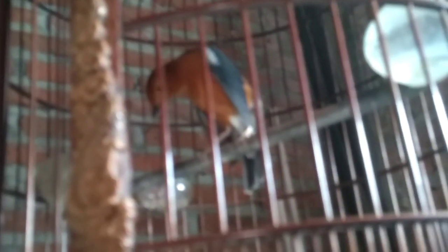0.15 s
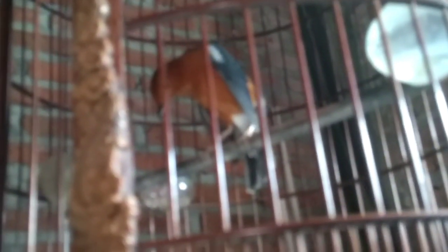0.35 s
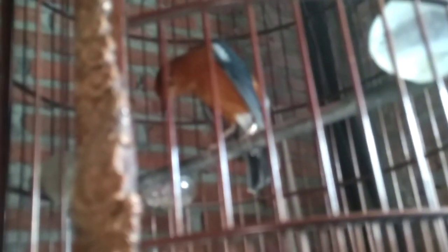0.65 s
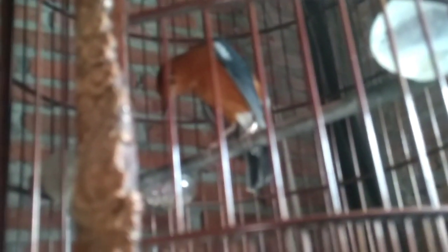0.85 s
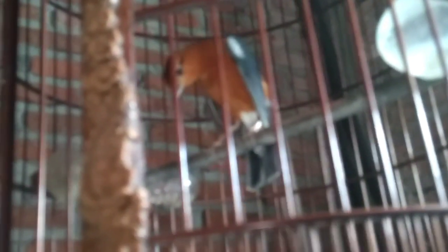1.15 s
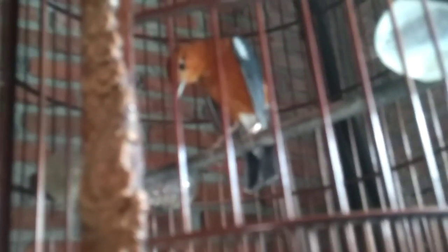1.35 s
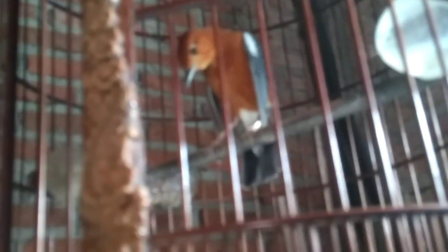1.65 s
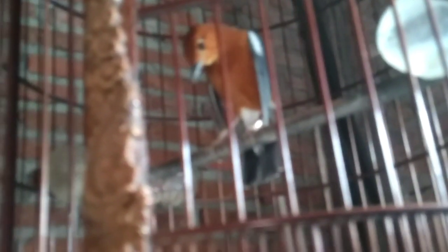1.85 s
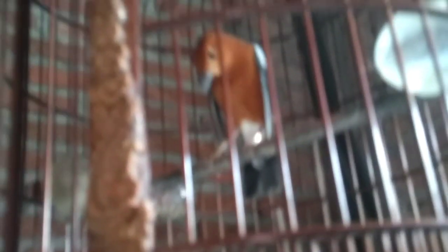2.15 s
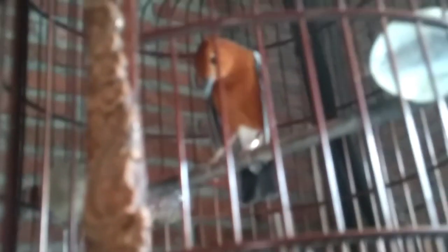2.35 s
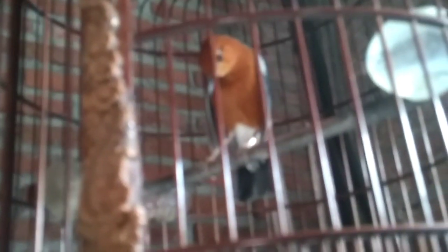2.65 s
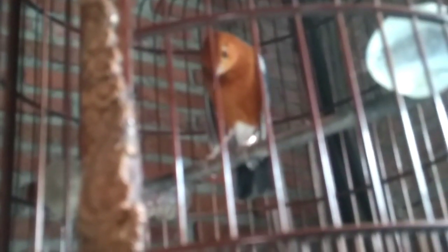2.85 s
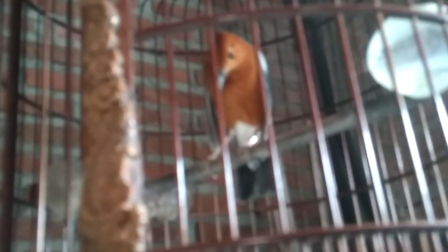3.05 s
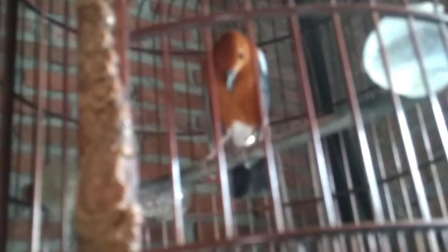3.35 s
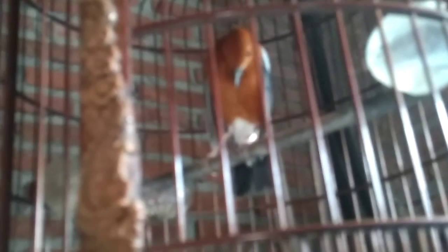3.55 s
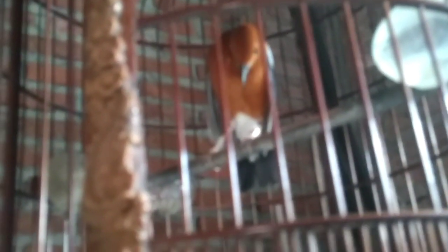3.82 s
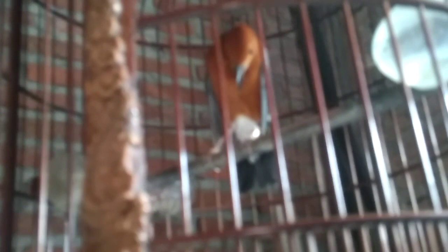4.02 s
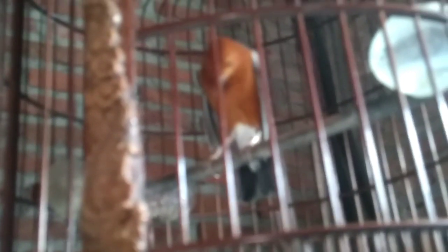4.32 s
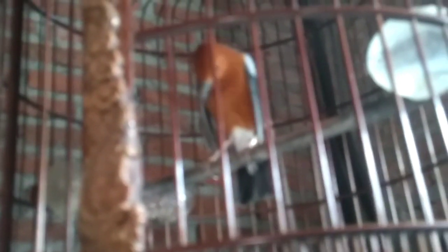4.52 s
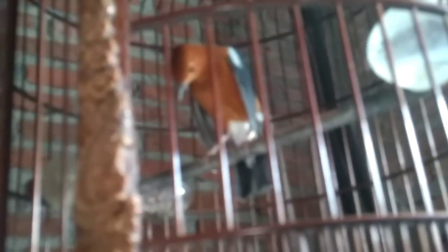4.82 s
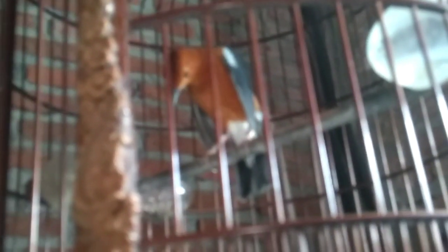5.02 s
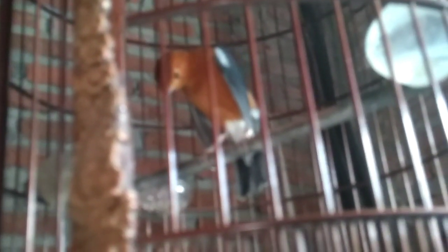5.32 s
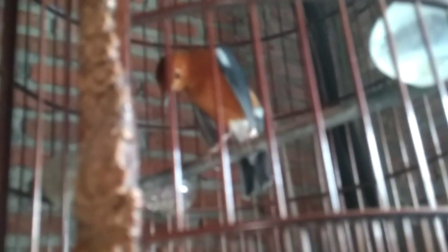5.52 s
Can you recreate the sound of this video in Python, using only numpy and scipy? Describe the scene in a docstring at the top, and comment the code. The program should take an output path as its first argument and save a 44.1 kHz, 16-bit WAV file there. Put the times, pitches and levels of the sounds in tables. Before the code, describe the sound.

One caged thrush sings close to the microphone in a quiet brick-walled space. Two short harsh rasps, a pause, then a soft rising whistle with a quick scoop, four growly upslurs, a burst of rasps and a descending trill, four loud high calls, and finally faint low whistles. A thin wavering hissy whistle swells behind the later part. Short hard reflections follow the notes; sound is almost entirely on the left.

```python
"""A harsh rasp opens the song of a caged thrush close to a one-channel microphone, and a second rasp follows.
Then come a rising whistle, a scoop, four upslurs, a chatter of trills and rasps, loud arched calls and soft low whistles.
Each kind of syllable is one gesture, repeated: curves of pitch, strength and roughness drive a stack of harmonics.
Brick walls throw the notes back, and the loudest overload the recorder. Behind the song, a wavering tone
inside hiss makes a thin whistle that swells and fades, over a soft knock and a quiet bed of noise."""
import sys
import numpy as np
from scipy import signal
from scipy.fft import rfft, irfft
from scipy.io import wavfile
from scipy.ndimage import uniform_filter1d, minimum_filter1d

SR = 44100
rng = np.random.default_rng(int(sys.argv[2]) if len(sys.argv) > 2 else 0)


def unload_wav(signal):
    """Save mono or channel-first audio to the path in sys.argv[1] as 16-bit WAV at rate SR, clipped to [-1, 1]."""
    wavfile.write(
        sys.argv[1],
        SR,
        np.round(np.clip(np.atleast_2d(signal).T, -1, 1) * 32767).astype(np.int16),
    )


N = 250488
TIME = np.arange(N) / SR  # seconds

# Levels of notes are before the level of their phrase; upper_db is the upper overtones against the fundamental.
# Rasps, which pass a crest and tumble with a rebound onto a buzzing shelf, then sag: start_s, crest_s, landing_s,
# sag_s, end_s, start_hz, crest_hz, shelf_hz, end_hz, rebound (share of pitch), level_db, overtones_db, rough (0-1)
RASP_NOTES = [(-.03, -.012, .044, .056, .1, 2700, 2950, 2100, 1260, .04, -11.5, 0, 1),
              (.187, .204, .224, 0.26, .266, 2650, 3520, 2170, 1830, .08, -12.5, 2, .9),
              (3.229, 3.243, 3.245, 3.254, 3.28, 2560, 2987, 2070, 1685, .05, -15, 2, .25),
              (3.31, 3.327, 3.347, 3.364, 3.384, 2553, 3050, 2280, 2300, .08, -10, -1, .85),
              (3.621, 3.634, 3.654, 3.685, 3.702, 2652, 3420, 2202, 1910, .1, -5.5, 0, .6),
              (3.8, 3.82, 3.862, 3.92, 3.888, 3610, 3370, 2130, 1827, .2, -8, 0, .8)]
# The voice of a rasp at start, crest, tumble, landing, sag and end:
# level_db (added to the note's), octave_db, upper_db, rough_share (of the note's roughness)
RASP_STAGES = [(-21, -8, -2, .15), (0, -9.5, -7, .35), (-6, -8, 2, .85), (-12, 10, 10, .5), (-8, 4, 6, .35),
               (-15, -6, -6, .3)]
TUMBLE_SWINGS_PER_S = 42
SHELF_SLOPE = .03  # the shelf tilts down by this share either side of its pitch

# Clear whistles, one curve each: time_s, pitch_hz, level_db, upper_db
RISING_WHISTLE_CURVE = [(1.257, 1344, -42, -22.5), (1.283, 1260, -31.5, -18), (1.32, 1205, -33.5, -13.5),
                        (1.385, 1241, -34.5, -11), (1.46, 1410, -33, -12.5), (1.472, 1542, -22, -27),
                        (1.52, 1698, -32, -11), (1.62, 1870, -24, -15.5), (1.74, 1965, -23, -12.5),
                        (1.93, 1940, -20.5, -9), (1.972, 2047, -29, -7)]
SCOOP_CURVE = [(2.05, 1990, -31, -28), (2.061, 1902, -22.5, -12.5), (2.084, 1829, -15, -13.5),
               (2.104, 2094, -15, -8), (2.121, 3050, -31.5, -21)]
LOW_PIP_CURVE = [(5.246, 1333, -40, -23), (5.265, 1198, -28.5, -23), (5.29, 1202, -45, -14)]
LOW_WHISTLE_CURVE = [(5.351, 1187, -35, -35), (5.391, 1197, -37.5, -13), (5.54, 1259, -33, -35),
                     (5.6, 1228, -29.5, -21), (5.68, 1300, -30.5, -31)]
# Brief burrs in the whistles: time_s, half_length_s, added_rough (0-1 scale)
WHISTLE_BURRS = [(1.258, 0.023, 0.72), (1.379, 0.0097, 0.51), (5.255, 0.048, 0.55), (5.346, 0.02, 1.06),
                 (5.575, 0.042, 0.34)]
WHISTLE_ROUGH, BURR_OCTAVE_DB = .02, -1.5
# the octave starts OCTAVE_OVER_DB above upper_db at LOW_HZ and loses OCTAVE_FALL_DB per octave above it
OCTAVE_OVER_DB, LOW_HZ, OCTAVE_FALL_DB = 3, 1244, 46

# Upslurs: start_s, length_s (full gesture), sung (share of it), pitch_hz, growl_hz, flick_hz,
# growl_swing (share of pitch), level_db, overtones_db
UPSLUR_NOTES = [(2.19, .12, 0.76, 2375, 1340, 2550, .03, -15.5, 2),
                (2.36, 0.12, 0.95, 2650, 1450, 3680, .05, -9.5, 0),
                (2.554, .127, 0.97, 2622, 1620, 3550, .2, -8.5, 0.5),
                (2.768, .148, 1, 2660, 1690, 3330, .22, -9, -1)]
# The gesture of an upslur: length_share, climb (0 growl, 1 note, 2 flick), level_db (added), octave_db, upper_db, rough (0-1)
UPSLUR_GESTURE = [(0, 0.055, -20.5, -12, -19, 0.2), (.08, 0.066, -6, -29, -9.5, 0.4),
                  (.3, 0.00076, -10.5, -11.5, -0.5, .45), (.44, .33, -6.5, -33, -1, 0.7),
                  (.58, .88, -11.5, -17.5, 0.5, .3), (.75, 1, 0, -36.5, -4, .04),
                  (.87, 1.22, -0.5, -32, -12, 0.08), (1, 1.98, -11, -19.5, 5.5, .3)]
GROWL_SWINGS_PER_S, GROWL_SHARE = 56, 0.54  # the pitch swings until this share of the gesture is over
# Notes from the other side of the syrinx, one curve each: time_s, pitch_hz, level_db, octave_db, upper_db, rough (0-1)
SIDE_NOTES = [
    [(2.245, 2940, -22, -15, 4, .27), (2.267, 3264, -23.5, -28, 2, 0.42), (2.285, 3411, -33, -25, 8, 0.13)],
    [(5.222, 2300, -44, 8.5, -21, .31), (5.236, 2703, -22, -36, -28, .12),
     (5.252, 2590, -32, -23, -22, 0.36)],
]

# Trills: start_s, end_s, pitch_hz, end_hz, first_rate (swings per s), last_rate (swings per s), level_db, swell_db
TRILL_NOTES = [(3.205, 3.236, 2350, 2690, 98, 105, -30.5, 13),
               (3.286, 3.322, 2550, 2650, 84, 75, -28.5, 12), (3.38, 3.531, 2720, 1697, 80, 46, -13.5, 2.5)]
TRILL_DEPTH, TRILL_ROUGH = .16, .3  # swing as a share of pitch; roughness 0-1
TRILL_BEND = 5.8  # the pitch holds, then bends late to its end
TRILL_DB_PER_OCTAVE, TRILL_PULSE_DB = 19, 4  # weaker as it sinks, louder at the top of each swing
TRILL_OCTAVE_DB, TRILL_UPPER_DB = -18, -1.5
TRILL_LOUD_DB, TRILL_BRIGHTEN = -13, 1.2  # below this level the overtones lose this many more dB per dB

# Arched calls: start_s, length_s, pitch_hz, level_db, overtones_db
ARCH_NOTES = [(4.307, 0.072, 4432, -3.5, 3), (4.527, .087, 4366, -6, -1), (4.728, .089, 4344, -7.5, 2)]
# Their clean rise and top, break and rough fall: length_share, pitch_ratio, level_db (added), octave_db, upper_db, rough (0-1)
ARCH_GESTURE = [(0, .57, -26, -15, -14, .08), (.104, .83, -4, -51, -19.5, 0.19),
                (.216, .975, -1.5, -47, -9, 0.22), (.53, 1.005, -1.5, -27.5, -13, 0.042),
                (.63, .83, -5, -26, -9.5, 0.198), (.73, .86, 0, -22.5, -7, 0.3315),
                (.88, .67, -11.5, -11.5, -8.5, .95), (1, 0.44, -19.5, -10, -5, .7)]
# The long wavering call that leads them: time_s, pitch_hz, level_db
LONG_CALL_CURVE = [(3.977, 2807, -22.5), (3.988, 4100, -8), (4, 4840, -7), (4.023, 3340, -8),
                   (4.034, 3700, -6), (4.058, 3794, -1.5), (4.074, 4062, -5), (4.094, 4060, -9.5),
                   (4.101, 3534, -6), (4.113, 4023, -5.5), (4.155, 3886, -8.5), (4.16, 3520, -7.5),
                   (4.17, 3702, -5.5), (4.186, 3196, -7), (4.2, 3508, -10)]
LONG_OCTAVE_DB, LONG_UPPER_DB, LONG_ROUGH = -18, -6, 0.049
LONG_BREAK_S = 0.0206  # how quickly roughness builds toward its end

# Colour of the bird's upper overtones, before the throat tightens: tone_hz, level_db
OVERTONE_COLOUR = [(3700, -4.5), (5300, -15), (6700, -9), (8600, -12), (9900, -2.5), (11000, -0.5),
                   (12000, 0.5), (13300, -5), (16000, -6)]
FADE_S = 0.0046  # every note opens and shuts this fast

# First reflections, before the shared early level: delay_s, gain_db
FIRST_ECHOES = [(.0031, -23), (.0074, -7), (0.0129, -5.5), (0.0176, -7)]
# Time for the ring of the walls to fall by 60 dB: tone_hz, t60_s
WALL_RING = [(1200, 0.18), (2500, 0.2), (4500, 0.15), (8000, 0.2), (11000, 0.17), (15000, 0.08)]

# The tone of the thin whistle, before its overall tone level: time_s, pitch_hz, level_db
THIN_TONE = [(3.38, 3500, -30), (3.55, 3590, -21), (3.88, 3827, -14.5), (4.28, 3940, -18.5),
             (4.44, 4150, -32), (4.52, 3700, -77), (4.88, 4250, -31), (4.96, 3700, -58.5),
             (5.04, 4050, -42.5), (5.11, 3620, -45), (5.17, 3830, -36), (5.54, 3730, -37.5),
             (5.68, 3560, -39)]
# Relative colour of its hiss: tone_hz, density_db (per Hz)
THIN_HISS_COLOUR = [(2800, -30), (3400, -10), (3900, 2), (4700, -0.5), (5700, -14), (8500, -6.5),
                    (11300, -1), (15000, -26)]
# Level of its hiss: time_s, level_db
THIN_HISS_LEVEL = [(3.38, -55), (3.55, -27.5), (4.42, -23.5), (4.53, -36), (4.88, -31), (4.96, -43),
                   (5.68, -49)]
# Relative colour of the quiet background: tone_hz, density_db (per Hz)
BACKGROUND_COLOUR = [(25, 2), (110, -8.5), (150, -1), (260, -15.5), (400, -9.5), (800, -21), (11000, -33),
                     (15000, -47)]
EDGE_HZ = 15600  # upper limit of the recorder


def thrush():
    """The whole song: five phrases, each with its own roughness and throat opening."""
    rasps = [rasp(*row) for row in RASP_NOTES]
    whistle_curves = RISING_WHISTLE_CURVE, SCOOP_CURVE, LOW_PIP_CURVE, LOW_WHISTLE_CURVE
    whistles = [whistle(curve) for curve in whistle_curves]
    upslurs = [upslur(*row) for row in UPSLUR_NOTES] + [side_note(curve) for curve in SIDE_NOTES]
    trills = [trill(*row) for row in TRILL_NOTES]
    arches = [long_call()] + [arch(*row) for row in ARCH_NOTES]
    song = phrase(rasps, level_db=1, jitter=0.094, shimmer=0.41, shake_hz=441, split=0.22,
                  low_hz=1417, high_hz=16250, waver=.015)
    song += phrase(whistles, level_db=1.5, jitter=0.083, shimmer=0.45, shake_hz=450, split=0.92,
                   low_hz=1145, high_hz=12570, waver=0.0061)
    song += phrase(upslurs, level_db=0.5, jitter=0.08, shimmer=0.1, shake_hz=280, split=0.346,
                   low_hz=1314, high_hz=11940, waver=0.0046)
    song += phrase(trills, level_db=0, jitter=0.058, shimmer=0.7, shake_hz=440, split=0.19,
                   low_hz=1540, high_hz=15500, waver=.01)
    song += phrase(arches, level_db=0.5, jitter=0.09, shimmer=1.0, shake_hz=493, split=0.41,
                   low_hz=1875, high_hz=16650, waver=0.00298)
    return song


def phrase(gestures, level_db, jitter, shimmer, shake_hz, split, low_hz, high_hz, waver):
    """Syllables that share one kind of roughness and one opening of throat and beak."""
    wobble = waver * flutter(70)
    pitch_shake = jitter * flutter(shake_hz)
    level_shake = shimmer * flutter(shake_hz)
    voice = sum(syllable(gesture, wobble, pitch_shake, level_shake, split) for gesture in gestures)
    return amp(level_db) * band(voice, low_hz, high_hz, order=7)


def syllable(gesture, wobble, pitch_shake, level_shake, split, pure_db=-25, tightening=1.5):
    """The syrinx sounds one harmonic stack; roughness shakes it and splits the pitch in half."""
    # a gesture holds times, pitch Hz, level dB, octave dB and upper dB against the fundamental, roughness
    t, *controls = np.broadcast_arrays(*gesture)
    span = np.round(t * SR).astype(int)
    hz, db, octave_db, upper_db, rough = uniform_filter1d(np.array(controls), size=160, axis=1)
    # the vibration stays cleaner until roughness passes a threshold
    chaos = np.clip(rough, 0, 1) * np.clip(rough / .4, 0, 1)
    hz = hz * (1 + wobble[span])
    phase = 2 * np.pi * np.cumsum(hz * (1 + chaos * pitch_shake[span])) / SR
    k = np.arange(3, 13)[:, None]  # numbers of the upper harmonics
    # in pure notes the throat is tuned tighter and lets fewer overtones through
    tight = 1 + tightening * np.clip(octave_db / pure_db, 0, 1)
    below_limit = np.clip((SR / 2 - k * hz) / (SR / 10), 0, 1)  # fades harmonics out before half of SR
    weight = amp(at_hz(OVERTONE_COLOUR, k * hz) * tight) * below_limit
    upper = (weight * np.sin(k * phase)).sum(0) / np.sqrt((weight ** 2).sum(0) + 1e-12)
    voice = np.sin(phase) + amp(octave_db) * np.sin(2 * phase) + amp(upper_db) * upper
    # strong and weak cycles alternate, which puts lines between the harmonics
    voice = voice * (1 + chaos * (level_shake[span] + split * np.cos(phase / 2)))
    gate = np.clip(np.minimum(t - t[0], t[-1] - t) / FADE_S, 0, 1)
    out = np.zeros(N)
    out[span] = np.sqrt(2) * amp(db) * voice * np.sin(np.pi / 2 * gate) ** 2
    return out


def rasp(start, crest, landing, sag, end, start_hz, crest_hz, shelf_hz, end_hz,
         rebound, level_db, overtones_db, rough):
    """As the pitch tumbles, the voice turns rough and its strength moves into the overtones."""
    t = during(start, end)
    shelf_top, shelf_bottom = shelf_hz * (1 + SHELF_SLOPE), shelf_hz * (1 - SHELF_SLOPE)
    hz = np.interp(t, [start, crest, landing, sag, end],
                   [start_hz, crest_hz, shelf_top, shelf_bottom, end_hz])
    stages = [start, crest, (crest + landing) / 2, landing, sag, end]
    db, octave_db, upper_db, share = (np.interp(t, stages, column) for column in np.transpose(RASP_STAGES))
    depth = rebound * np.sqrt(np.interp(t, stages[1:4], [0, 1, 0]))  # only between crest and landing
    swing = 1 + depth * np.cos(2 * np.pi * TUMBLE_SWINGS_PER_S * (t - crest))
    return t, hz * swing, level_db + db, octave_db + overtones_db, upper_db + overtones_db, rough * share


def whistle(curve):
    """A clear note, purer the higher it goes; burrs roughen it and bring out the octave."""
    t = during(curve[0][0], curve[-1][0])
    hz, db, upper_db = follow(curve, t)
    burrs = np.array([np.exp(-((t - s) / length) ** 2) for s, length, _ in WHISTLE_BURRS])
    octave_db = upper_db + OCTAVE_OVER_DB - OCTAVE_FALL_DB * np.log2(hz / LOW_HZ)
    octave_db = octave_db + burrs.max(0) * (BURR_OCTAVE_DB - octave_db)
    rough = WHISTLE_ROUGH + np.array(WHISTLE_BURRS)[:, -1] @ burrs
    return t, hz, db, octave_db, upper_db, rough


def upslur(start, length, sung, pitch_hz, growl_hz, flick_hz, growl_swing, level_db, overtones_db):
    """A swinging growl steadies and climbs into a pure note, then flicks upward."""
    t = during(start, start + sung * length)
    share = (t - start) / length
    climb, db, octave_db, upper_db, rough = follow(UPSLUR_GESTURE, share)
    hz = np.interp(climb, [0, 1, 2], [growl_hz, pitch_hz, flick_hz])
    depth = growl_swing * np.clip(1 - (share / GROWL_SHARE) ** 4, 0, 1)
    swing = 1 - depth * np.cos(2 * np.pi * GROWL_SWINGS_PER_S * (t - start))
    return t, hz * swing, level_db + db, octave_db + overtones_db, upper_db + overtones_db, rough


def side_note(curve):
    """A brief note from the other side of the syrinx."""
    t = during(curve[0][0], curve[-1][0])
    return t, *follow(curve, t)


def trill(start, end, pitch_hz, end_hz, first_rate, last_rate, level_db, swell_db):
    """Pitch and strength swing fast about their centre, at a rate that drifts from first to last."""
    t = during(start, end)
    share = np.linspace(0, 1, len(t))
    centre = pitch_hz + (end_hz - pitch_hz) * share ** TRILL_BEND
    rate = first_rate + (last_rate - first_rate) * share
    # the sung span opens half a fade early, so the count of swings starts below zero
    swing = np.cos(2 * np.pi * (np.cumsum(rate) / SR - first_rate * FADE_S / 2))
    db = level_db + swell_db * share + TRILL_DB_PER_OCTAVE * np.log2(centre / pitch_hz)
    upper_db = TRILL_UPPER_DB + TRILL_BRIGHTEN * np.minimum(db - TRILL_LOUD_DB, 0)
    hz = centre * (1 + TRILL_DEPTH * swing)
    return t, hz, db + TRILL_PULSE_DB * swing, TRILL_OCTAVE_DB, upper_db, TRILL_ROUGH


def long_call():
    """A loud wavering note, fairly clean until it breaks up at the end."""
    t = during(LONG_CALL_CURVE[0][0], LONG_CALL_CURVE[-1][0])
    rough = LONG_ROUGH + np.exp((t - t[-1]) / LONG_BREAK_S)
    return t, *follow(LONG_CALL_CURVE, t), LONG_OCTAVE_DB, LONG_UPPER_DB, rough


def arch(start, length, pitch_hz, level_db, overtones_db):
    """The arched gesture at one length, pitch, strength and brightness."""
    t = during(start, start + length)
    ratio, db, octave_db, upper_db, rough = follow(ARCH_GESTURE, (t - start) / length)
    return t, pitch_hz * ratio, level_db + db, octave_db + overtones_db, upper_db + overtones_db, rough


def walls(x, early_db=-2, tail_db=-12, build_s=0.036):
    """A few hard reflections, then a short tail that dies band by band."""
    t = TIME[:SR // 2]
    is_tap = rng.random(len(t)) < 4000 / SR  # about 4000 random echoes per second
    taps = rng.standard_normal(len(t)) * is_tap * (1 - np.exp(-(t / build_s) ** 2))
    hz, when, z = signal.stft(taps, SR, nperseg=256)
    decay = amp(-60 * when / at_hz(WALL_RING, hz)[:, None])
    tail = signal.istft(z * decay, SR)[1]
    response = amp(tail_db) * tail / np.linalg.norm(tail)
    for delay, db in FIRST_ECHOES:
        response[round(delay * SR)] += amp(db + early_db)
    return signal.fftconvolve(x, response)[:N]


def thin_whistle(waver=0.006, flicker=0.47, tone_db=-2):
    """A wavering, uneven tone inside a band of nearly even hiss."""
    hz, line_db = follow(THIN_TONE, TIME)
    hiss_db, = follow(THIN_HISS_LEVEL, TIME)
    phase = 2 * np.pi * np.cumsum(hz * (1 + waver * flutter(90))) / SR
    tone = np.sqrt(2) * np.sin(phase) * (1 + flicker * flutter(40))
    hiss = coloured(THIN_HISS_COLOUR, patchy_db=1)
    start = np.clip((TIME - THIN_TONE[0][0]) / 0.041, 0, 1)  # silent before the first row
    return start * (amp(line_db + tone_db) * tone + amp(hiss_db) * hiss)


def bump(start_s=2.19, db=-38, low_hz=60, high_hz=200, decay_s=0.058):
    """A soft low knock during the upslurs, made of low noise that dies away."""
    age = np.maximum(TIME - start_s, 0)
    rumble = unit(band(rng.standard_normal(N), low_hz, high_hz, order=2))
    return amp(db) * rumble * (age > 0) * np.exp(-age / decay_s)


def background():
    """Quiet noise, strongest in the lows, with small uneven patches."""
    return coloured(BACKGROUND_COLOUR, patchy_db=2)


def coloured(spectrum, patchy_db):
    """Noise of a given colour with small, brief patches."""
    hz, _, z = signal.stft(rng.standard_normal(N), SR, nperseg=1024)
    patches = unit(uniform_filter1d(rng.standard_normal(z.shape), size=4, axis=1))
    gain = amp(at_hz(spectrum, hz)[:, None] + patchy_db * patches)
    return unit(signal.istft(z * gain, SR)[1][:N])


def flutter(top_hz):
    """Random motion of rms 1, mostly slower than top_hz."""
    hz = np.fft.rfftfreq(N, 1 / SR)
    return unit(irfft(rfft(rng.standard_normal(N)) / (1 + (hz / top_hz) ** 4), N))


def band(x, low_hz, high_hz, order):
    """A band-pass, steeper for a higher order."""
    edges = [low_hz, min(high_hz, SR / 2 - 1)]
    return signal.sosfilt(signal.butter(order, edges, "band", fs=SR, output="sos"), x)


def during(start, end):
    """The sample times of one note, with half a fade to spare at each end."""
    return TIME[(TIME > start - FADE_S / 2) & (TIME < end + FADE_S / 2)]


def follow(rows, t):
    """Reads every column of a curve at the times t."""
    s, *columns = np.transpose(rows)
    return [np.interp(t, s, c) for c in columns]


def at_hz(points, hz):
    """Reads a spectrum on a log-frequency axis."""
    f, value = np.transpose(points)
    return np.interp(np.log(hz + 1), np.log(f), value)


def amp(db):
    """Turns decibels into a plain factor."""
    return 10 ** (np.asarray(db) / 20)


def unit(x):
    """Scales a signal to rms 1."""
    return x / np.sqrt(np.mean(x ** 2) + 1e-20)


def scene(floor_db=-54, leak_db=-52, idle_db=-65):
    """The sound is on the left; the right channel carries only a faint leak and its own noise."""
    song = thrush()
    left = song + walls(song) + thin_whistle() + bump() + amp(floor_db) * background()
    right = amp(leak_db) * left + amp(idle_db) * background()
    return np.array([left, right])


def record(dry, limit=1.573):
    """A quick limiter holds the loudest notes, the sharpest peaks still clip; then the treble is cut off."""
    gain = minimum_filter1d(limit / np.maximum(abs(dry[0]), limit), size=200)
    clipped = np.clip(dry * uniform_filter1d(gain, size=200), -1, 1)
    low_pass = signal.firwin(301, EDGE_HZ, window="blackman", fs=SR)
    return signal.oaconvolve(clipped, low_pass[None], "same")


dry = scene()
out = record(dry)
unload_wav(out)
```